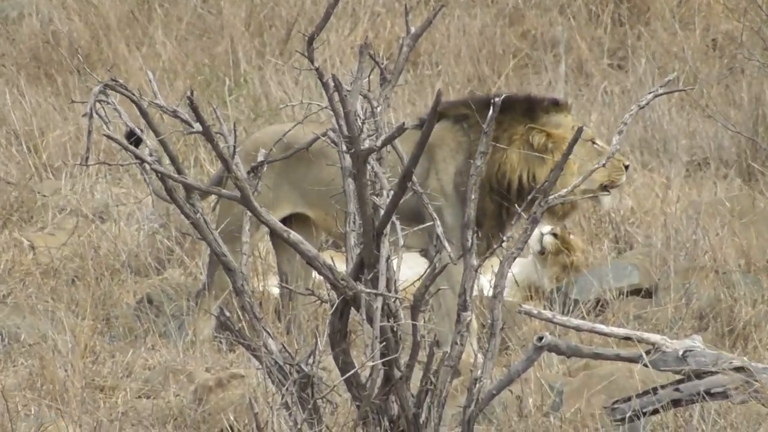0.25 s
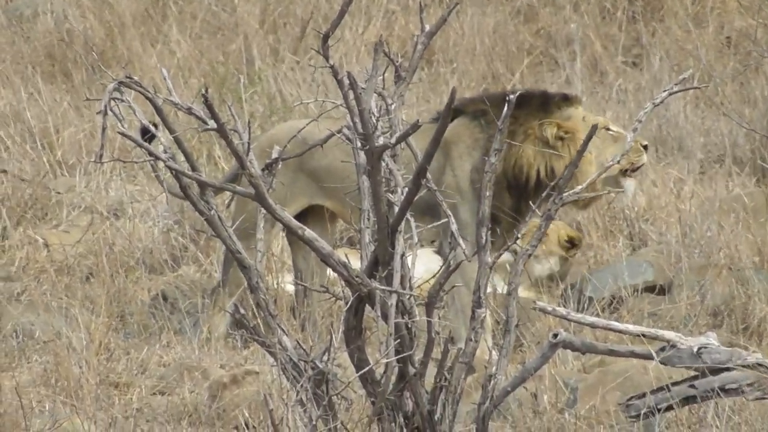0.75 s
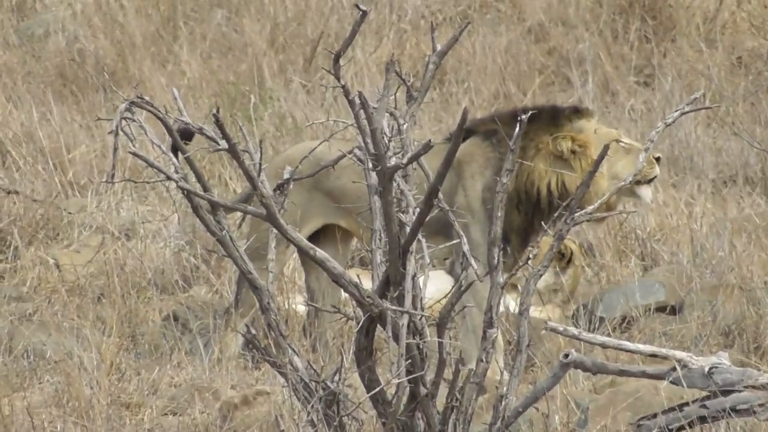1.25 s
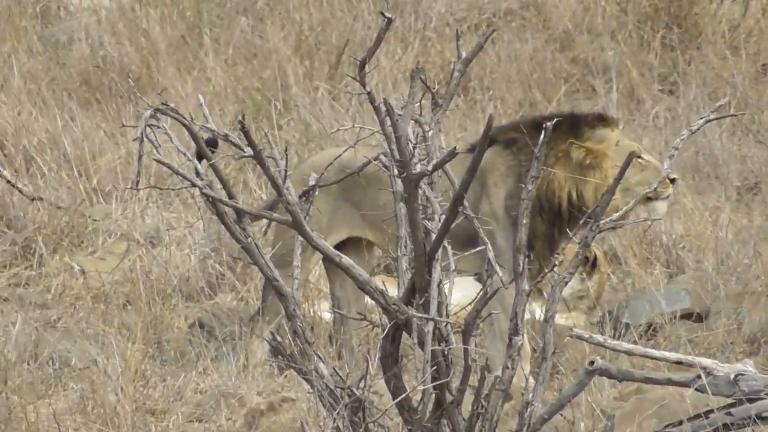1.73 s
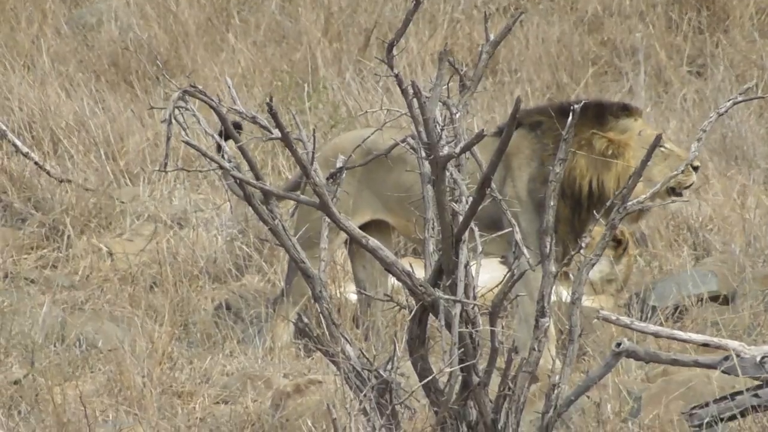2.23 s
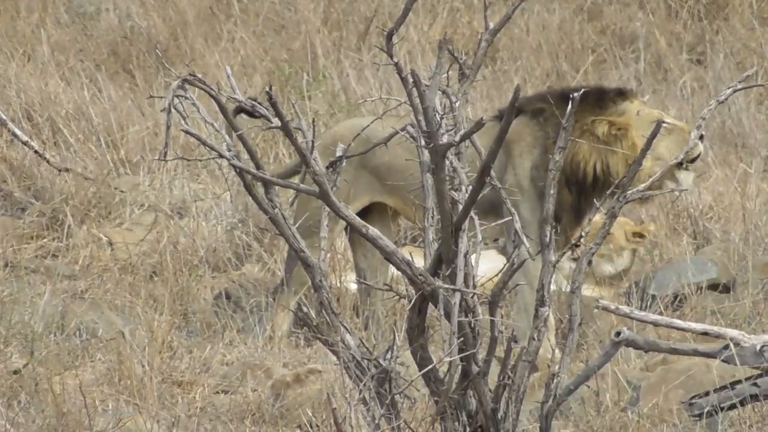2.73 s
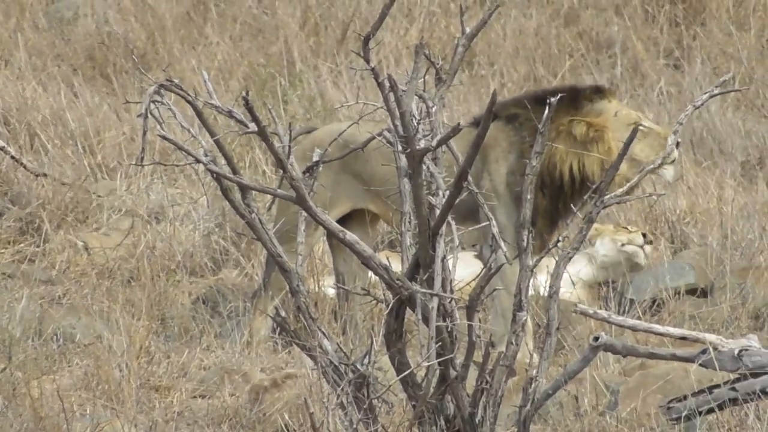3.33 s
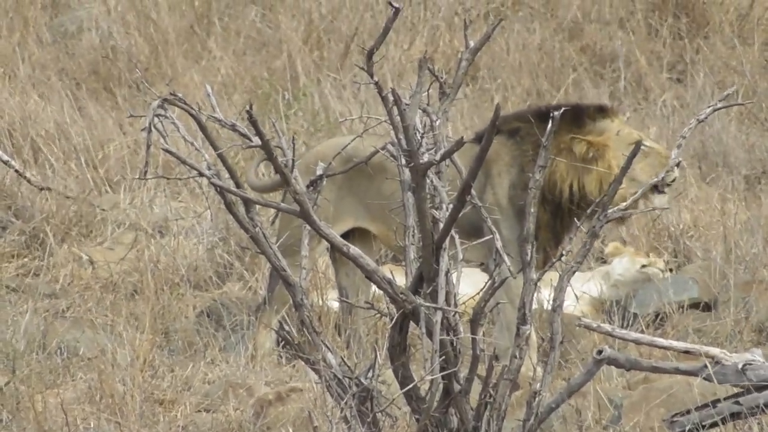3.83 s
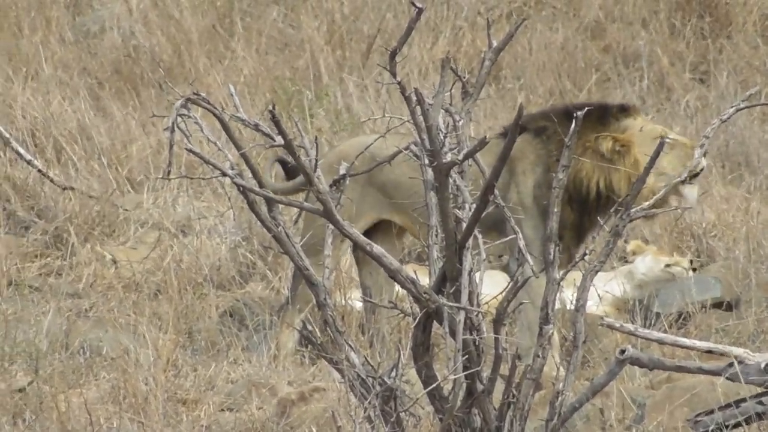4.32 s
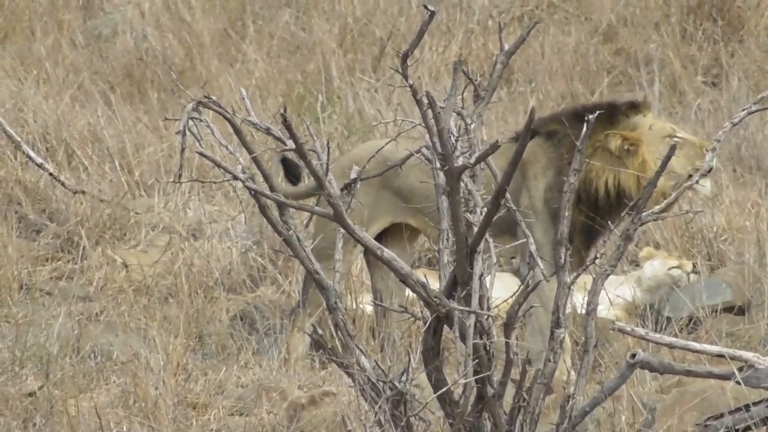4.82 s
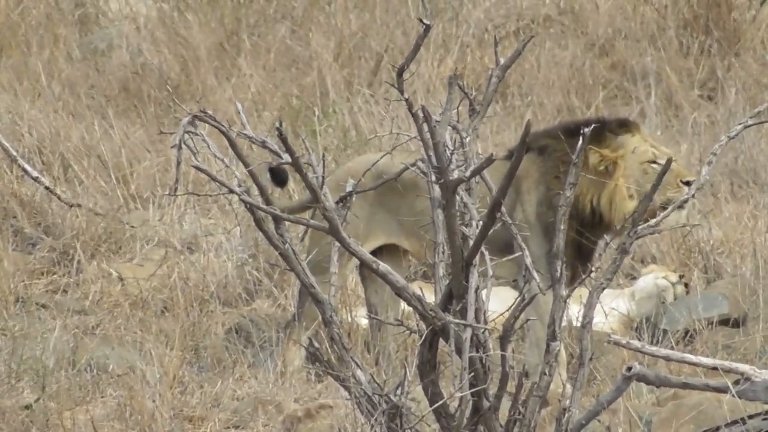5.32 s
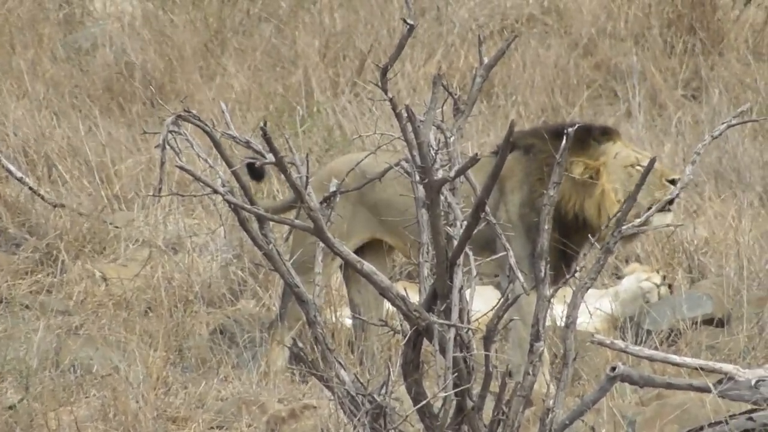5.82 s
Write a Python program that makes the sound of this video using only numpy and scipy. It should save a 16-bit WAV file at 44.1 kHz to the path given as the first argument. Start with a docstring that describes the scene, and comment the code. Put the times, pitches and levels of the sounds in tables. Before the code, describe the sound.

Outdoors in dry bushland, a male lion at some distance gives three low, chesty moans, each just over half a second, starting rough, clearing, then breaking into a rasp. Faint echoes follow. A tiny bird whistle comes just before the first. Breeze rumbles and hisses softly in the grass, growing stronger, and puffs of wind thump the unshielded stereo microphone, hardest at the end.

```python
"""Open dry bushland: a lion some way off gives three low, drawn-out moans.
Each is a strong chest tone with throat overtones and a rasp of gated noise, roughest at its start and end.
The bush answers with faint scattered echoes; a far bird, a bent sine, whistles once.
A breeze of shaped noise rumbles and hisses in the grass; short noise puffs thump the microphone."""
import sys
import numpy as np
from scipy import signal
from scipy.fft import rfft, irfft
from scipy.io import wavfile
from scipy.ndimage import uniform_filter1d

SR = 44100
rng = np.random.default_rng(int(sys.argv[2]) if len(sys.argv) > 2 else 0)


def waveform_to_disk(signal):
    """Save audio, clipped to [-1, 1], as 16-bit WAV at the path in sys.argv[1]."""
    frames = np.transpose(np.atleast_2d(signal))
    scaled = np.clip(frames, -1, 1) * 32767
    samples = np.round(scaled).astype(np.int16)
    wavfile.write(sys.argv[1], SR, samples)


N = 267334
TIME = np.arange(N) / SR
BINS = np.fft.rfftfreq(N, 1 / SR)
REST_HZ = 137.6  # resting pitch of the voice

# The gesture of each moan, one row a moan. Columns:
# start_s, folds_catch_s, voice_clears_s, overtones_strongest_s, voice_breaks_s, end_s, swell_s, release_s,
# chest_db, overtones_db, rasp_near_end_db, first_roughness_0_to_1, open_mouth_lift_db, relative_damping
MOAN_GESTURES = [(.87, .985, .96, 1.02, 1.375, 1.588, .07, .036, -21.8, -33, -63, 0.54, 15.5, .9),
                 (2.77, 2.865, 2.83, 3.19, 3.335, 3.49, .09, .024, -19, -36.4, -60.5, 0.53, 8, 1.1),
                 (4.45, 4.527, 4.705, 4.8, 4.945, 5.112, .02, .018, -19.2, -27, -55, .68, 8, 1.4)]
# The pitch curve of each moan, one list a moan: it arches and sinks. Columns: time_s, pitch_hz
MOAN_PITCHES = [
    [(0.92, 131.4), (1.01, 151.8), (1.1, 160.1), (1.16, 161), (1.28, 144.5), (1.41, 138.2), (1.54, 128.1),
     (1.57, 138.6)],
    [(2.8, 123.2), (2.83, 141.3), (2.97, 175.6), (3.08, 174.7), (3.13, 157.1), (3.24, 145.8), (3.32, 142.4),
     (3.47, 128.3)],
    [(4.52, 133.8), (4.56, 143.8), (4.67, 148.1), (4.87, 145.3), (4.99, 138.8), (5.11, 125.2)],
]


def lion():
    """The three moans, each from its own gesture and pitch curve."""
    calls = np.zeros(N)
    for gesture, pitch in zip(MOAN_GESTURES, MOAN_PITCHES):
        add(calls, *moan(gesture, pitch))
    return calls


# Upper resonances, heard in the rasp. Columns: centre_hz, width_hz, level_db
RASP_RESONANCES = [(1950, 91, -1.5), (2253, 95, 3.5), (2580, 380, -2), (3140, 110, -3.5), (3610, 400, -2),
                   (4200, 250, -9), (7600, 1800, -13.5)]
# Harder pushes of air within the moans, mostly near their ends. Columns: time_s, rasp_db, overtones_db
AIR_PUSHES = [(1.502, -57, -48), (3.435, -55.5, -48), (4.54, -55, -37), (4.925, -55, -35), (5.08, -49, -38)]
PUSH_S = .016
CHEST_DB_PER_HZ = -.12  # the chest tone weakens as the pitch climbs above rest


def moan(row, pitch, jitter=0.0035, rough_jitter=0.016, shimmer=0.094, second_db=-38, open_share=0.6,
         flicker_db=1.3):
    """Heavy folds give a near-pure chest tone; their pulses and gated turbulence ring the throat."""
    *gesture, damping = row
    t = np.arange(row[0], row[5] + .06, 1 / SR)
    size = len(t)
    chest_db, throat_db, rasp_db, mouth_db, rough = effort(t, *gesture)

    pitch_hz = follow(pitch, t)[0]
    hz = pitch_hz * (1 + (jitter + rough_jitter * rough) * wander(size, 80))
    angle = 2 * np.pi * np.cumsum(hz) / SR
    chest = np.sqrt(2) * (np.cos(angle) + gain_of(second_db) * np.cos(2 * angle))
    chest *= 1 + shimmer * rough * wander(size, 50)

    # a rough voice closes the folds harder at some moments than at others
    pulses = sum(np.cos(k * angle) for k in range(1, 16))
    pulses = pulses * (1 + 0.33 * rough * wander(size, 110))
    # air rushes through once a cycle
    gate = open_share + ((1 + np.cos(angle)) / 2) ** 2
    clean = throat(pulses, pitch_hz, mouth_db, damping=0.91 * damping)
    noisy = throat(gate * rng.standard_normal(size), pitch_hz, mouth_db, damping=1.22 * damping)
    overtones = (1 - rough) * clean + rough * steadied(noisy)
    overtones /= np.hypot(1 - rough, rough)
    overtones *= gain_of(1.34 * rough * wander(size, 45) + flicker_db * wander(size, 20))

    rasp = evened(resonate(gate * rng.standard_normal(size), RASP_RESONANCES))
    rasp *= gain_of(2.0 * wander(size, 33))

    push_s, *push_db = np.transpose(AIR_PUSHES)
    push_shapes = np.exp(-((t - push_s[:, None]) / PUSH_S) ** 2)
    rasp_push, throat_push = gain_of(push_db) @ push_shapes
    chest_db = chest_db + CHEST_DB_PER_HZ * np.maximum(pitch_hz - REST_HZ, 0)
    voice = gain_of(chest_db) * chest
    voice += np.hypot(gain_of(throat_db), throat_push) * overtones
    voice += np.hypot(gain_of(rasp_db), rasp_push) * rasp
    return t[0], voice * signal.windows.tukey(size, .05)


LEAD_DB, LEAD_S = -14, .025  # the first flow of air
CATCH_DB, CATCH_S, SWELL_DB, RELEASE_DB = -7, .012, -5.5, -20  # the chest is faint until the folds catch
THROAT_CATCH_DB, THROAT_FADE_DB_PER_S = -6, 19
THROAT_LEAD_S = .008  # the throat rings just before the folds catch or the voice clears
THROAT_RELEASE_S, THROAT_HANG_S = .014, .025  # air flows a little longer than the chest tone lasts
ROUGH_CLEAR, ROUGH_BROKEN, CHANGE_S = .28, .72, .016  # irregularity of the folds, and its time of change
RASP_GROWTH_DB_PER_S, RASP_ROUGH_DB = 12, 9  # the rasp grows along the moan and with roughness
MOUTH_REST_DB, MOUTH_OPEN_S = -1, .06  # upper-resonance lift before the mouth opens; opening time


def effort(t, start, catches, clears, strongest, breaks, end, swell, release,
           chest_db, throat_db, rasp_db, first_rough, lift_db):
    """A moan catches, swells, holds and drops; it starts rough, clears, then breaks up as the mouth opens."""
    rough = first_rough + (ROUGH_CLEAR - first_rough) * step(t, clears, CHANGE_S)
    rough += (ROUGH_BROKEN - ROUGH_CLEAR) * step(t, breaks, CHANGE_S)
    mouth = MOUTH_REST_DB + lift_db * step(t, breaks, MOUTH_OPEN_S)

    lead = LEAD_DB * np.exp((start - t) / LEAD_S)
    chest = chest_db + lead + CATCH_DB * (1 - step(t, catches, CATCH_S))
    chest += SWELL_DB * np.exp(-np.maximum(t - catches, 0) / swell)
    chest += RELEASE_DB * np.exp((t - end) / release)

    throat_catch = min(catches, clears) - THROAT_LEAD_S
    flow = lead + THROAT_CATCH_DB * (1 - step(t, throat_catch, CATCH_S))
    flow += RELEASE_DB * np.exp((t - end - THROAT_HANG_S) / THROAT_RELEASE_S)
    overtones = throat_db + flow - THROAT_FADE_DB_PER_S * abs(t - strongest)
    rasp = rasp_db + flow + RASP_GROWTH_DB_PER_S * (t - end) + RASP_ROUGH_DB * (rough - ROUGH_BROKEN)
    return chest, overtones, rasp, mouth, np.clip(rough, 0, 1)


# Resonances of the long throat at the resting pitch, before damping scales the widths. Columns:
# centre_hz, width_hz, level_db, share_of_mouth_lift
THROAT_RESONANCES = [(424, 142, -3.5, 0.22), (601, 89, 2, .2), (810, 160, -12.5, 1), (1130, 110, -11, .9),
                     (1333, 135, -19, 0.52)]
THROAT_LOW_HZ, THROAT_HIGH_HZ = 352, 1490


def throat(drive, pitch_hz, mouth_db, damping, stretch=0.06):
    """An overtone rings out as it glides through a resonance; an open mouth lifts the upper ones."""
    shorter = (pitch_hz / REST_HZ) ** stretch  # the resonances rise slightly with the pitch
    rings, power = 0, 0
    for k, (hz, width, db, share) in enumerate(THROAT_RESONANCES):
        gain = gain_of(db + share * mouth_db)
        # neighbours ring with opposite signs, which hollows the valleys between them
        rings = rings + (-1) ** k * gain * glide(drive, hz * shorter, damping * width)
        power = power + gain ** 2 * width
    # below and above the resonances it stays dark
    band = signal.butter(7, [THROAT_LOW_HZ, THROAT_HIGH_HZ], "band", fs=SR, output="sos")
    # dividing by the power lets the mouth change the colour, not the loudness
    return evened(signal.sosfilt(band, rings / np.sqrt(power)))


def glide(x, hz, width):
    """A resonance that follows the curve hz: shift down to zero, smooth twice, shift back."""
    turn = np.exp(2j * np.pi * np.cumsum(hz) / SR)
    r = np.exp(-np.pi * np.sqrt(2) * width / SR)
    smooth = signal.lfilter([(1 - r) ** 2], [1, -2 * r, r ** 2], x / turn)
    return 2 * (turn * smooth).real


def resonate(x, modes):
    """Parallel resonances, each applied twice for dark valleys."""
    out = 0
    for hz, width, db in modes:
        b, a = signal.iirpeak(hz, hz / width / np.sqrt(2), SR)
        once = signal.lfilter(b, a, x)
        out = out + gain_of(db) * signal.lfilter(b, a, once)
    return out


BIRD_START_S, BIRD_LENGTH_S, BIRD_DB = .69, .09, -65
BIRD_HZ, BIRD_DIP_HZ, BIRD_DIP_S = 3050, 700, 0.015


def bird():
    """A far bird: one thin sine whistle whose pitch dips in the middle and rises again."""
    t = np.arange(0, BIRD_LENGTH_S, 1 / SR)
    hz = BIRD_HZ - BIRD_DIP_HZ * np.exp(-((t - BIRD_LENGTH_S / 2) / BIRD_DIP_S) ** 2)
    whistle = np.sin(2 * np.pi * np.cumsum(hz) / SR)
    return BIRD_START_S, gain_of(BIRD_DB) * signal.windows.tukey(len(t), .3) * whistle


# Decay of the echo in the bush. Columns: frequency_hz, t60_s
BUSH_DECAY = [(140, 1.3), (500, 0.72), (1500, 0.98), (6000, 0.14)]


def bush(x):
    """Scattered echoes from shrubs and slopes; the bass lingers longest."""
    scattered = rng.random((2, SR)) < 2000 / SR  # about 2000 echoes a second
    taps = rng.standard_normal((2, SR)) * scattered * (TIME[:SR] > .03)
    taps[1] = .8 * taps[0] + .6 * taps[1]  # the two sides are alike but not equal
    hz, t, z = signal.stft(taps, SR, nperseg=512)
    t60 = read(BUSH_DECAY, hz)[0][:, None]
    tail = signal.istft(z * gain_of(-60 * t / t60) / np.sqrt(t60), SR, nperseg=512)[1]
    return signal.fftconvolve(x[None], tail / np.linalg.norm(tail[0]), axes=1)[:, :N]


# Puffs of wind on the microphone, one row a puff. Columns: time_s, level_db, rise_s, decay_s, corner_hz
WIND_PUFFS = [(.497, -24.5, .0042, .02, 139), (0.687, -36, .012, .018, 100.6),
              (4.031, -21, .0061, .0088, 245), (5.504, -23, 0.027, .031, 66),
              (5.548, -8, .0077, .0051, 306), (5.563, -22.5, 0.014, .0097, 192),
              (5.977, -23.5, .0067, .0096, 65), (6.011, -16, .011, .0052, 157),
              (6.039, -9.5, 0.0055, .0068, 258), (6.058, -10.5, .0037, .0087, 302)]


def wind_puffs():
    """Every puff of wind on the microphone, placed in time."""
    puffs = np.zeros((2, N))
    for row in WIND_PUFFS:
        add(puffs, *puff(*row))
    return puffs


# Stereo spread of the puffs: how far the side level stands above the mid across frequency. Columns:
# frequency_hz, side_minus_mid_db
PUFF_SPREAD = [(40, -18), (100, -9), (280, 0), (700, 9.5), (1300, 12.5), (3000, 3), (5000, 6)]


def puff(s, db, rise, decay, corner_hz, low_share=0.23, slope=2.76,
         crack_db=-33, crack_hz=2700, crack_width_hz=2600):
    """An eddy strikes the microphone: a dull pop of band-shaped noise, brighter with a higher corner."""
    t = np.arange(-SR // 8, SR // 8) / SR
    hz = np.fft.rfftfreq(len(t), 1 / SR)
    colour = hz ** 2 / (hz ** 2 + (low_share * corner_hz) ** 2)
    colour /= np.sqrt(1 + (hz / corner_hz) ** (2 * slope))
    eddies = irfft(rfft(rng.standard_normal((2, len(t)))) * colour, len(t))

    # the pressure swells quickly, holds a moment and dies away
    swell, fade = np.exp(-(t / rise) ** 2), np.exp(1 - np.hypot(1, t / decay))
    pressure = gain_of(db) * np.where(t < 0, swell, fade)
    mid, side = steadied(eddies, size=300) * pressure
    side = irfft(rfft(side) * gain_of(read(PUFF_SPREAD, hz)[0]), len(t))

    # the crack at the edge of the port goes with pressure squared, so it favours the hardest puffs
    edge = evened(resonate(rng.standard_normal(len(t)), [(crack_hz, crack_width_hz, 0)]))
    crack = gain_of(crack_db) * pressure ** 2 * edge
    return s + t[0], np.array([mid + side, mid - side]) + crack


# The breeze freshens unevenly. Columns: time_s, rumble_db, dry_grass_hiss_db
BREEZE_LEVELS = [(0, -60, -58.5), (.4, -55.5, -59.3), (1.4, -55, -59), (2.4, -45.5, -59), (4.3, -46, -58.2),
                 (4.8, -42, -56.2), (5.6, -40.5, -57.5), (5.92, -43.5, -54)]
# Spectrum of the rumble at the microphone. Columns: frequency_hz, relative_density_db
RUMBLE_SPECTRUM = [(10, -6), (28, 4), (45, 0), (75, -5), (120, -17), (300, -30), (900, -71)]
# Spectrum of the wash from the bush. Columns: frequency_hz, relative_density_db
WASH_SPECTRUM = [(20, -12.5), (80, -5), (170, -0.5), (280, -6), (420, -7.5), (600, -9), (850, -12.5),
                 (1300, -23), (1800, -28.5), (2800, -36), (5000, -44.5), (16000, -61)]
# Spectrum of the hiss of dry grass. Columns: frequency_hz, relative_density_db
GRASS_SPECTRUM = [(300, -26), (1500, 0), (2800, -4.5), (3600, -2), (4300, -4.5), (5000, -11), (6300, -4.5),
                  (7400, 0.5), (8500, 1.5), (11000, -2.5), (15500, -5.5)]
WASH_DB, WASH_SHARE = -43.5, 0.25  # the wash follows a share of the rumble's swing


def breeze():
    """Rumble at the microphone, wash from the bush, hiss from the dry grass."""
    rumble_db, grass_db = follow(BREEZE_LEVELS, TIME)
    wash_db = WASH_DB + WASH_SHARE * (rumble_db - rumble_db.mean())
    rumble = air(RUMBLE_SPECTRUM, rumble_db, flutter_db=4.8, flutter_hz=5.0)
    wash = air(WASH_SPECTRUM, wash_db, flutter_db=0.2, flutter_hz=32)
    grass = air(GRASS_SPECTRUM, grass_db, flutter_db=0.7, flutter_hz=14)
    return rumble + wash + grass


# Left-right likeness of the moving air. Columns: frequency_hz, correlation
AIR_LIKENESS = [(30, 0.87), (150, 0.84), (600, 1), (2000, 0.98), (3000, 1), (6500, 1), (8000, 0.96),
                (10000, 0.3), (15000, .15)]


def air(spectrum, level_db, flutter_db, flutter_hz):
    """Shaped noise at both ports that swells and flutters with the breeze."""
    left, other = rfft(rng.standard_normal((2, N)))
    same = np.clip(read(AIR_LIKENESS, BINS)[0], -1, 1)
    pair = np.array([left, same * left + np.sqrt(1 - same ** 2) * other])
    noise = evened(irfft(pair * gain_of(read(spectrum, BINS)[0]), N))
    return noise * gain_of(level_db + flutter_db * wander(N, flutter_hz))


# The two microphone ports, for sound from the front. Columns:
# frequency_hz, left_minus_right_db, left_lead_radians
PORT_BALANCE = [(40, -1.5, 0.29), (145, -2.5, 0), (435, -2.5, 0.6), (624, -1.5, .63), (1150, 0.9, 0.52),
                (2400, 0.2, 0.09), (16100, .3, 0)]


def ports(pair):
    """The two ports hear sound from the front with small level and phase offsets across frequency."""
    balance_db, lead = read(PORT_BALANCE, BINS)
    half = gain_of(balance_db / 2) * np.exp(1j * lead / 2)
    return irfft(rfft(pair) * np.array([half, 1 / half]), N)


def gain_of(db):
    """Decibels to amplitude."""
    return 10 ** (np.asarray(db) / 20)


def evened(x):
    """Scales to rms 1."""
    return x / np.sqrt(np.mean(x ** 2) + 1e-20)


def steadied(x, size=1500):
    """Scales to a running rms of about 1, over a window of size samples smoothed twice."""
    power = uniform_filter1d(uniform_filter1d(x ** 2, size), size)
    return x / np.sqrt(abs(power) + 1e-12)


def wander(size, hz):
    """Slow random drift of rms 1, up to about hz."""
    f = np.fft.rfftfreq(size, 1 / SR)
    return evened(irfft(rfft(rng.standard_normal(size)) / (1 + (f / hz) ** 4), size))


def step(t, at, seconds):
    """A smooth change from 0 to 1 around the time at."""
    return (1 + np.tanh((t - at) / seconds)) / 2


def read(points, hz):
    """Columns of a spectrum table, joined on a log-frequency axis."""
    f, *columns = np.transpose(points)
    return [np.interp(np.log(hz + 1), np.log(f + 1), c) for c in columns]


def follow(rows, t):
    """Columns of a curve table at the times t."""
    s, *columns = np.transpose(rows)
    return [np.interp(t, s, c) for c in columns]


def add(mix, s, sound):
    """Mixes a sound in at time s."""
    part = mix[..., round(s * SR):][..., :sound.shape[-1]]
    part += sound[..., :part.shape[-1]]


def scene():
    """Lion and bird in the bush, the breeze, and its puffs on the microphone."""
    calls = lion()
    add(calls, *bird())
    echoes = gain_of(-23.5) * bush(calls)
    return ports(calls + echoes + breeze()) + wind_puffs()


EDGE_HZ = 15780  # upper band limit


def record(dry):
    """Peaks round off at full scale; soft ends; then the band limit."""
    rounded = dry / (1 + dry ** 6) ** (1 / 6)
    limited = rounded * signal.windows.tukey(N, .0008)
    lowpass = signal.firwin(1023, EDGE_HZ, window=("kaiser", 9), fs=SR)
    return signal.oaconvolve(limited, lowpass[None], "same")


dry = scene()
out = record(dry)
waveform_to_disk(out)
```